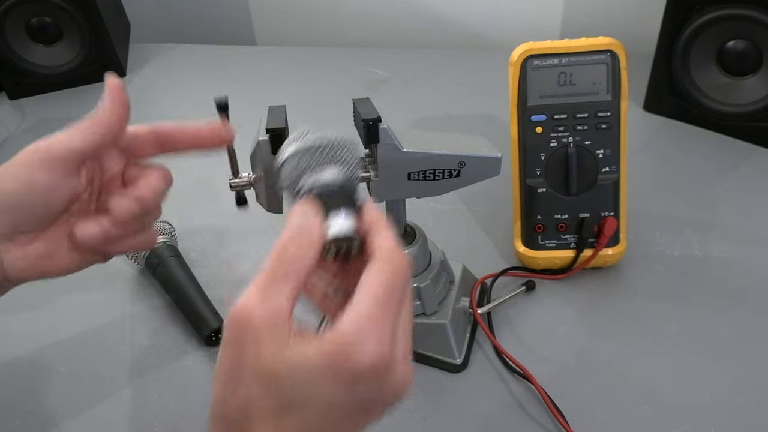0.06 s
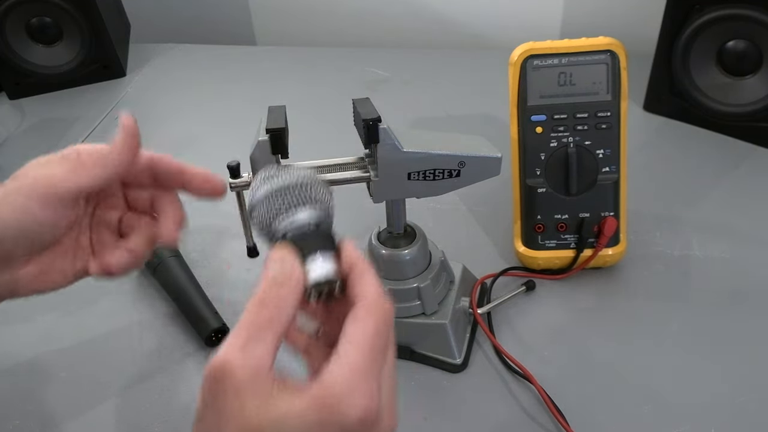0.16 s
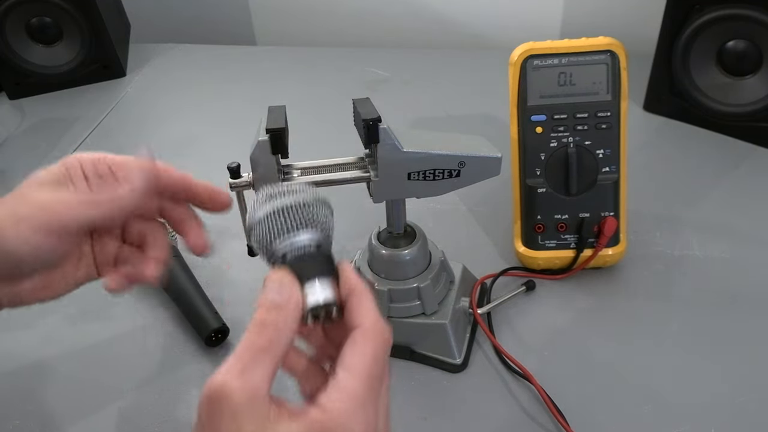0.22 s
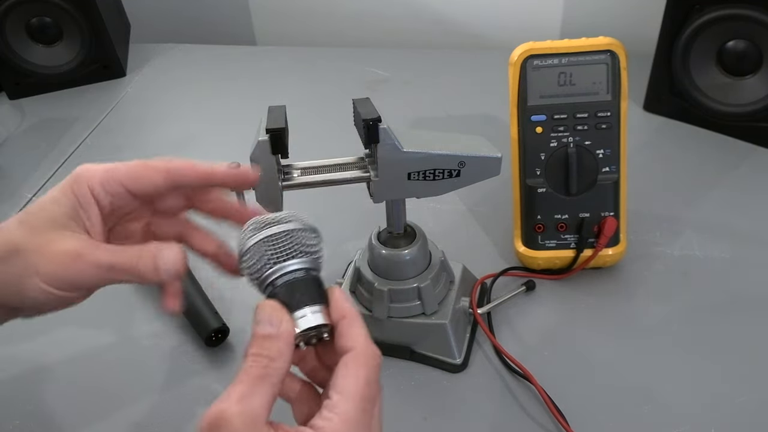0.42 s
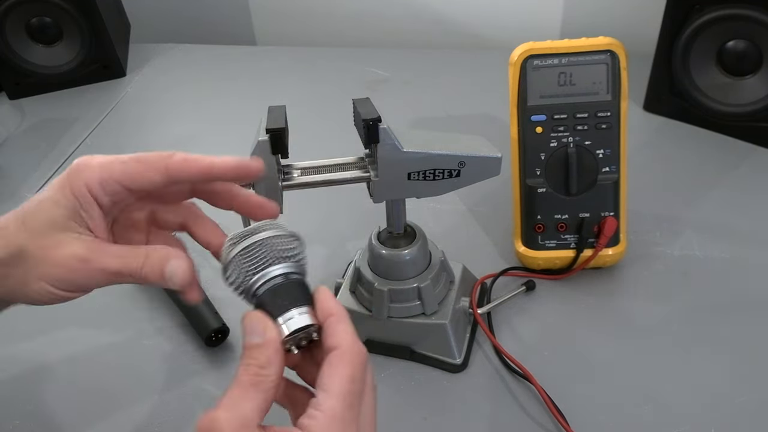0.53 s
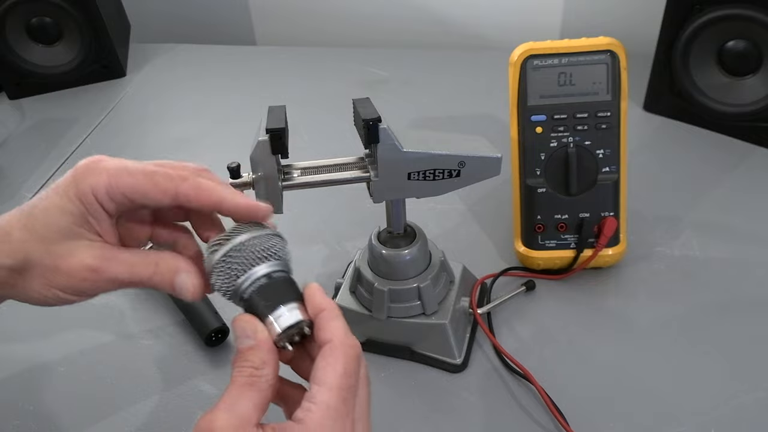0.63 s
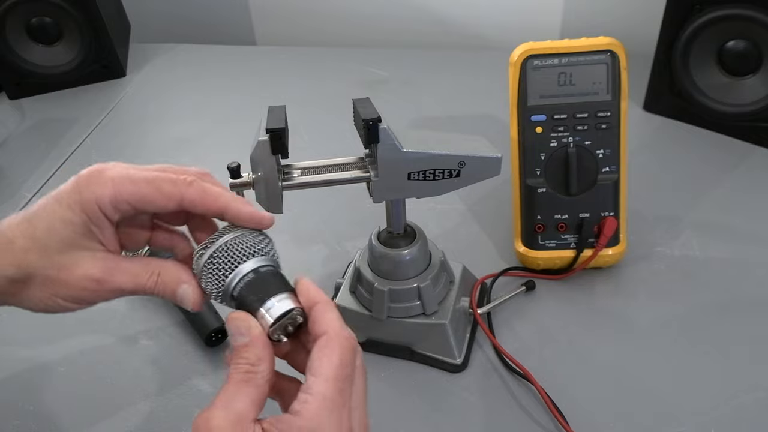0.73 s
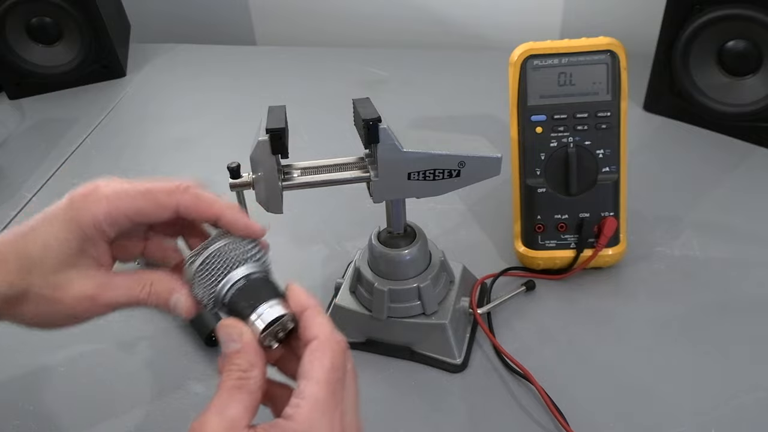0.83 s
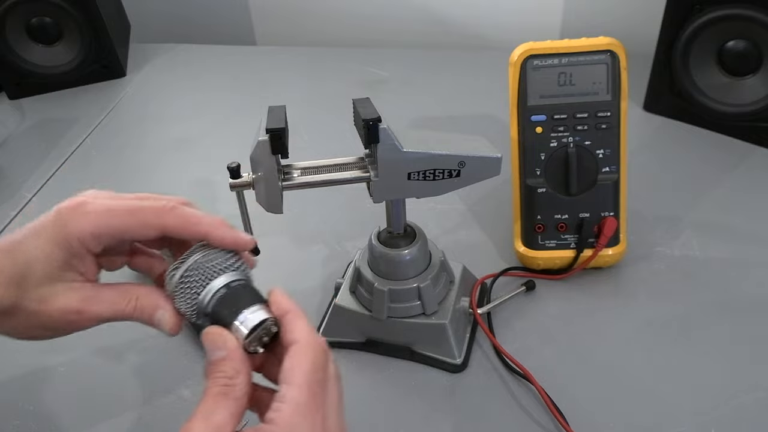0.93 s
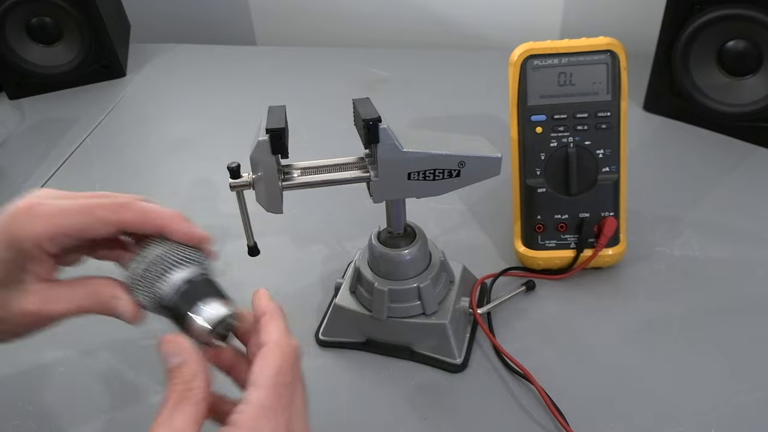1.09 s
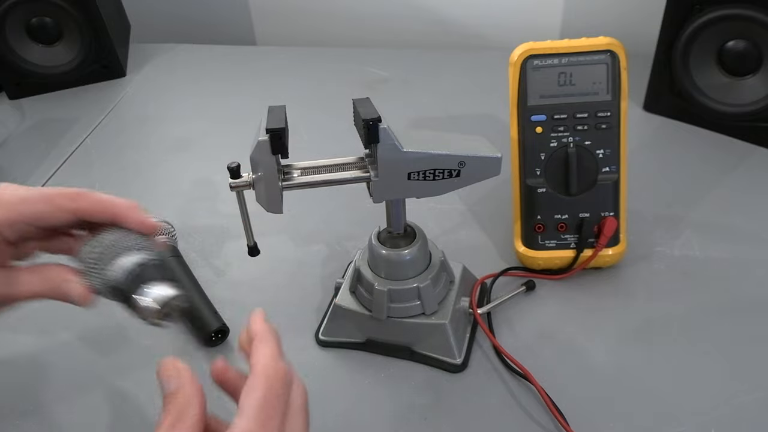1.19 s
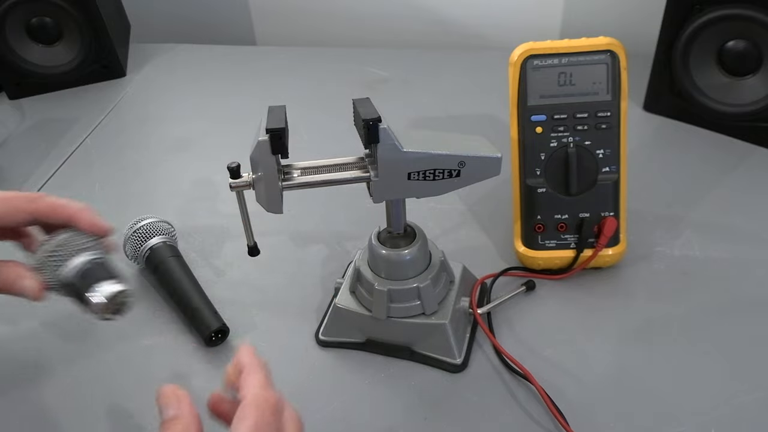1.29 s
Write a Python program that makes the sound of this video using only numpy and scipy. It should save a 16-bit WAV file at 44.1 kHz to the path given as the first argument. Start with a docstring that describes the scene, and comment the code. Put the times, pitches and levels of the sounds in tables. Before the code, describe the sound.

A single bright metallic clack: a vise's steel handle rod scrapes briefly through its screw head, then its knob lands, bounces rapidly and rings shortly. Small quiet workshop, close stereo microphone, faint air noise beneath.

```python
"""Small quiet workshop, bench vise near a stereo microphone: a finger tips the sliding handle.
The steel rod scrapes down through the screw head (random grains through damped rings), and its end knob
lands with one bright clack (filtered noise bursts) that rings rod, vise and table (decaying modes, a thud).
The knob bounces briefly, the room answers with a diffuse tail, and air noise and faint hum lie beneath."""
import sys
import numpy as np
from scipy import signal
from scipy.fft import rfft, irfft
from scipy.io import wavfile
from scipy.ndimage import uniform_filter1d

SR = 44100
rng = np.random.default_rng(int(sys.argv[2]) if len(sys.argv) > 2 else 0)


def to_wav(s):
    """Save 16-bit WAV."""
    ch = np.atleast_2d(s).T  # columns
    pcm = np.round(np.clip(ch, -1, 1) * 32767)  # PCM
    wavfile.write(sys.argv[1], SR, pcm.astype(np.int16))


N = 59535  # length in samples
T = np.arange(N) / SR  # time, s
F = np.fft.rfftfreq(N, 1 / SR)  # frequency, Hz


def undb(db):
    """Decibels to gain."""
    return 10 ** (np.asarray(db) / 20)


def over_time(points):
    """Reads (t/s, value) points along the whole sound."""
    return np.interp(T, *np.array(points).T)


def over_hz(points, hz):
    """Reads (f/Hz, value) points on a log-frequency axis."""
    p = np.array(points, float)
    return np.interp(np.log(np.maximum(hz, 1)), np.log(p[:, 0]), p[:, 1])


def pan(db):
    """Left and right gains for a left-minus-right level difference."""
    return undb(np.array([[db], [-db]]) / 2)


def unit(x):
    """Scales a response to unit energy in each channel."""
    return x / np.sqrt(np.sum(x ** 2, axis=-1, keepdims=True))


def fade(t60):
    """Exponential decay that falls 60 dB in t60 seconds."""
    return np.exp(-np.log(1000) * T / t60)


def through(x, response):
    """Plays a sound through a response."""
    return signal.fftconvolve(np.atleast_2d(x), np.atleast_2d(response), axes=-1)[:, :N]


def soften(x, hz):
    """Gentle first-order low-pass."""
    return signal.sosfilt(signal.butter(1, min(hz, SR * .45), fs=SR, output="sos"), x)


def delay(x, seconds):
    """The same sound, later."""
    k = int(max(seconds, 0) * SR)
    silence = np.zeros(x.shape[:-1] + (k,))
    return np.concatenate([silence, x[..., :N - k]], axis=-1)


def click(colour, size=4096):
    """Shortest causal click with a given spectrum, unit energy (minimum phase by folded cepstrum)."""
    magnitude = undb(over_hz(colour, np.fft.rfftfreq(size, 1 / SR)))
    cepstrum = irfft(np.log(magnitude))
    cepstrum[1:size // 2] *= 2
    cepstrum[size // 2 + 1:] = 0
    return unit(irfft(np.exp(rfft(cepstrum))))


def dense_ring(t60):
    """Countless close modes: fading noise, evened out so that no band sticks out."""
    spectrum = rfft(rng.standard_normal(N) * fade(t60))
    bins = max(int(np.log(1000) * N / SR / t60), 1)
    smooth_power = uniform_filter1d(abs(spectrum) ** 2, bins)
    even = irfft(spectrum / np.sqrt(smooth_power), N)
    return unit(even * (np.arange(N) < N / 2))  # drops what wraps round to the end


def stereo_noise(likeness):
    """Spectra of left and right noise with a given correlation per frequency."""
    mid, side = rfft(rng.standard_normal((2, N)))
    c = np.clip(likeness, -1, 1)
    return mid * np.sqrt((1 + c) / 2) + np.array([[1], [-1]]) * side * np.sqrt((1 - c) / 2)


# Knob contacts, landing then bounces: t/s, relative level/dB, low-pass corner f/Hz
KNOB_CONTACTS = [(0.2444, -9.5, 11900), (0.2457, 1.5, 7000), (0.2482, 1, 6500), (0.2525, -11, 3050),
                 (0.258, -2, 2070), (0.2653, -7, 2370)]
# Spectrum of the clack at the casting: f/Hz, relative level/dB per Hz
CLACK_SPECTRUM = [(30, -39), (90, -13), (200, -16), (400, -6), (700, -10.5), (1100, -10), (1700, 0),
                  (2400, 2), (2900, -9.5), (3700, -2), (4300, -11), (4900, -3.5), (5800, -6.5), (7000, -15),
                  (8500, -7), (9800, -15), (11200, -7.5), (12200, -31), (15000, -39)]
# Spectrum of the table-top thud: f/Hz, relative level/dB per Hz
THUD_SPECTRUM = [(30, -35), (60, -18), (90, -7.5), (130, 6), (190, -5), (270, -2), (400, -8), (700, -10),
                 (1500, -46)]
CRACK_DB, CRACK_T60_S = -3, 0.0067  # sharp edge of each contact
CLACK_DB, CLACK_T60_S = -7, 0.029  # quickly damped casting
THUD_DB, THUD_T60_S = -16, 0.23
CLACK_PAN_DB = -2  # left minus right: leans to the right microphone
RING_DB = -4


def knob_landing():
    """Contacts excite the damped casting, later bounces duller; the first full blow rings modes and table."""
    contacts = 0
    for s, db, corner_hz in KNOB_CONTACTS:
        crack = undb(CRACK_DB) * dense_ring(CRACK_T60_S)
        body = undb(CLACK_DB) * dense_ring(CLACK_T60_S)
        contacts = contacts + undb(db) * delay(soften(crack + body, corner_hz), s)
    clack = pan(CLACK_PAN_DB) * through(contacts, click(CLACK_SPECTRUM))
    thud = undb(THUD_DB) * through(dense_ring(THUD_T60_S), click(THUD_SPECTRUM))
    full_blow_s = KNOB_CONTACTS[1][0]
    ring = delay(undb(RING_DB) * metal(scraped=False) + thud, full_blow_s)
    return clack, ring


# Modes of rod, vise and table:
# f/Hz, relative level struck/dB, t60/s, relative level scraped/dB, left minus right level/dB
METAL_MODES = [ (137, -44, .48, -57, 0), (337, -45, .17, -72, 0), (403, -37, .18, -69, 0),
               (590, -44, .16, -70, -1), (905, -43, .15, -67, -1), (1405, -42, .15, -51, 0),
               (1648, -36, .15, -51, -1), (1860, -38, .15, -56, -1), (1975, -44, .28, -61, -2),
               (2268, -34, .17, -56, -2), (2356, -41, .19, -62, -1), (3403, -43, .12, -63, 2),
               (3895, -35.5, .2, -59, -3), (3990, -52, .42, -55, -1), (5497, -44, .16, -63, -1),
               (8096, -49, .19, -73, 0), (8720, -53, .14, -67, 0), (10690, -34.5, .2, -52.5, 5)]
TWIN_HZ, TWIN_DB = 22, -10  # mean offset of each mode's weak twin, and its level below the mode


def metal(scraped):
    """Decaying modes, each beating with a weak twin a little higher, when struck or scraped."""
    out = 0
    draws = rng.random((len(METAL_MODES), 2))
    for (hz, struck_db, t60, scraped_db, pan_db), (offset, phase) in zip(METAL_MODES, draws):
        twin_hz = hz + TWIN_HZ * (offset + .5)
        twin = np.cos(2 * np.pi * (twin_hz * T + phase))
        pair = np.cos(2 * np.pi * hz * T) + undb(TWIN_DB) * twin
        level = undb(scraped_db if scraped else struck_db)
        out = pan(pan_db) * level * fade(t60) * pair - out  # neighbours swing opposite ways
    return out


# How hard the sliding rod scrapes: t/s, relative level/dB
SCRAPE_FORCE = [(0.130, -40), (0.140, -9), (0.153, -4.5), (0.164, -13), (0.185, 0), (0.203, -8.5),
                (0.226, -12.5), (0.243, -6)]
# Treble opens as the rod gains speed: t/s, low-pass corner f/Hz
SCRAPE_OPENING = [(0.142, 1900), (0.185, 8000)]
# Spectrum of the rasp: f/Hz, relative level/dB per Hz
SCRAPE_SPECTRUM = [(40, -17), (200, -25), (600, -16), (950, -10.5), (1350, 1.5), (1750, -2), (2700, -8.5),
                   (3300, -14), (4400, -16.5), (5400, -9), (6700, -27), (11000, -29), (14000, -46)]
GRAINS_PER_S, GRAIN_SPREAD_DB = 1800, 3.5
SCRAPE_LOW_HZ = 105  # high-pass corner
RASP_DB, RASP_T60_S, SCRAPE_RING_DB = -46, 0.022, -26


def rod_sliding():
    """Tiny catches of steel on steel drive a damped rasp and the modes, brighter as the rod speeds up."""
    happens = rng.random(N) < GRAINS_PER_S / SR
    strength = undb(GRAIN_SPREAD_DB * np.clip(rng.standard_normal(N), -2, 2))
    grains = happens * strength * rng.choice([-1, 1], N)
    sliding = (T > SCRAPE_FORCE[0][0]) * (T < SCRAPE_FORCE[-1][0])
    force = grains / grains.std() * undb(over_time(SCRAPE_FORCE)) * sliding
    (slow_s, slow_hz), (fast_s, fast_hz) = SCRAPE_OPENING
    speed = np.interp(T, [slow_s, fast_s], [0, 1])
    force = soften(force * (1 - speed), slow_hz) + soften(force * speed, fast_hz)
    force = signal.sosfilt(signal.butter(2, SCRAPE_LOW_HZ, "high", fs=SR, output="sos"), force)
    rasp = through(through(force, click(SCRAPE_SPECTRUM)), dense_ring(RASP_T60_S))
    return undb(RASP_DB) * rasp + undb(SCRAPE_RING_DB) * through(force, metal(scraped=True))


# The rod catches once as it starts to slide: t/s, f/Hz, level/dB, t60/s
ROD_CATCH = (0.1485, 3308, -53, 0.1)


def catch():
    """One faint decaying sine as the slide starts, centred between the microphones."""
    s, hz, db, t60 = ROD_CATCH
    return undb(db) * delay(fade(t60) * np.sin(2 * np.pi * hz * T), s)


# Soft rustle of the hand at the vise: t/s, level/dB
HAND_LEVEL = [(0, -71), (0.13, -65), (0.3, -82)]
# Spectrum of the rustle: f/Hz, relative level/dB per Hz
HAND_SPECTRUM = [(40, -21), (90, -1), (137, 14), (190, -6.5), (500, -7.5), (1300, -1.5), (2500, -13),
                 (5000, -23.5), (12000, -41)]


def hand():
    """A finger brushing the handle stirs the vise: coloured noise, no louder than the room's air."""
    rustle = through(rng.standard_normal(N), click(HAND_SPECTRUM))
    return rustle * undb(over_time(HAND_LEVEL))


# Decay of the small room: f/Hz, t60/s
ROOM_DECAY = [(100, 0.51), (500, 0.21), (2000, 0.22), (5000, 0.19), (12000, 0.22)]
ROOM_DB, ROOM_DELAY_S = -2.5, .002
ROOM_WIDE_HZ = 1800  # left-right correlation has fallen to one half here


def room(x, count=9):
    """Diffuse tail in overlapping bands, alike at both microphones in the bass and wide in the treble."""
    noise = stereo_noise(1 / (1 + (F / ROOM_WIDE_HZ) ** 2))
    centres = np.geomspace(60, 14000, count)
    tail = 0
    for hz, weight in zip(centres, np.eye(count)):
        band = irfft(noise * over_hz(np.c_[centres, weight], F), N)
        tail = tail + band * fade(over_hz(ROOM_DECAY, hz))
    return undb(ROOM_DB) * through(x.mean(axis=0), delay(unit(tail), ROOM_DELAY_S))


# Spectrum of the workshop air: f/Hz, relative level/dB per Hz
AIR_SPECTRUM = [(25, -16), (45, -11), (70, -7.5), (110, -4.5), (200, -4), (400, -0.5), (600, -4.5),
                (1100, -0.4), (1400, -6.5), (2000, -7), (4000, -12.5), (6500, -16), (9000, -21),
                (12400, -28.5), (14000, -54)]
# Likeness of the air at the two microphones: f/Hz, left-right correlation
AIR_CORRELATION = [(40, .85), (200, 0.95), (600, 0.29), (1100, 0.1), (2000, 0.25), (5000, 0.54),
                   (9000, 0.71)]
# Wavering hum lines: f/Hz, half-width/Hz, level/dB, left-right correlation
HUM_LINES = [(161.04, 1.2, -77.5, 0.99), (241, 6.7, -80, 1), (330.3, 4.4, -81.5, 1), (481, 3.7, -82, 0.79),
             (685, 12, -76.5, -0.976), (1197, 6.3, -81.5, .8), (1721, 51, -80, .9), (2540, 19, -87, 1)]
AIR_DB = -65


def workshop():
    """Steady air noise with faint hum lines, each a narrow noise band that wavers."""
    air = irfft(stereo_noise(over_hz(AIR_CORRELATION, F)) * undb(over_hz(AIR_SPECTRUM, F)), N)
    out = undb(AIR_DB) * air / air.std()
    for hz, width_hz, db, likeness in HUM_LINES:
        line = irfft(stereo_noise(likeness) / (1 + ((F - hz) / width_hz) ** 2), N)
        out = out + undb(db) * line / line.std()
    return out


RING_ROOM_DB = -12  # the ring feeds the room less than the clack does


def scene():
    """Slide and clack in the small room."""
    slide = rod_sliding() + catch()
    clack, ring = knob_landing()
    answer = room(slide + clack + undb(RING_ROOM_DB) * ring)
    return slide + clack + ring + answer + workshop() + hand()


TOP_HZ = 15300


def record(dry):
    """The recorder cuts the top with a steep low-pass."""
    return signal.sosfilt(signal.ellip(8, .2, 70, TOP_HZ, fs=SR, output="sos"), dry)


dry = scene()
out = record(dry)
to_wav(out)
```